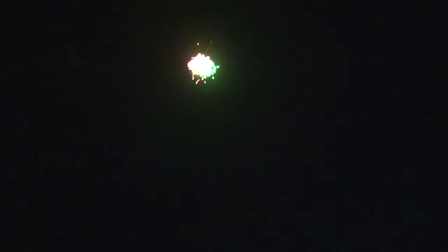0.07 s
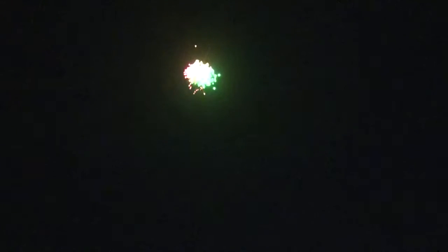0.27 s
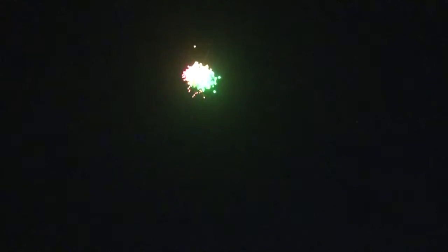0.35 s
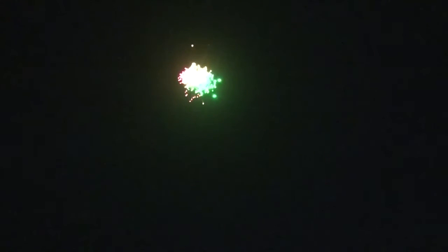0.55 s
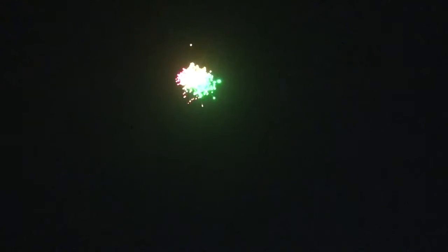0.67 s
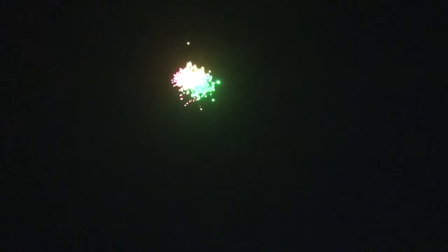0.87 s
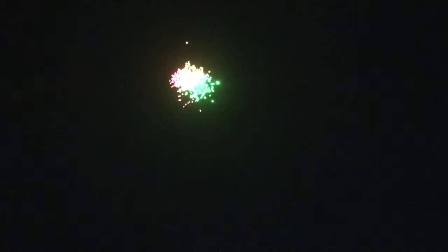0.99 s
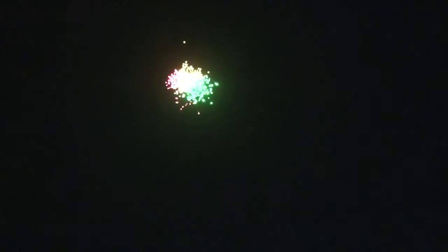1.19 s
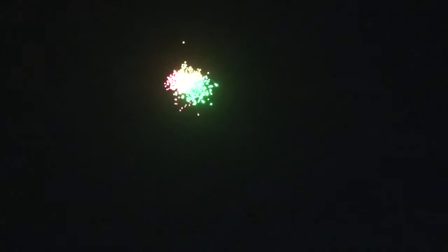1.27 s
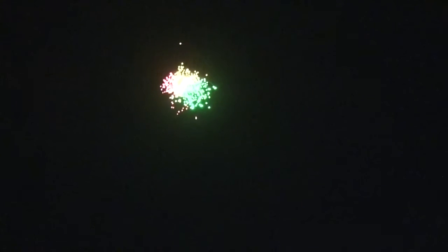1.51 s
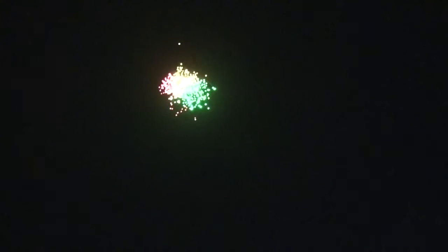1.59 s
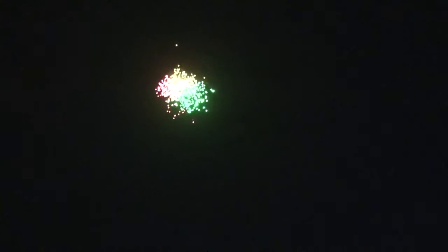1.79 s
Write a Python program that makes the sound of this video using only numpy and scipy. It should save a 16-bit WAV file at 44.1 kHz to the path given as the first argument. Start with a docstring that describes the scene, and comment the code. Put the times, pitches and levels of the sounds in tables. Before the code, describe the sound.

A firework shell bursts overhead at about 0.2 seconds with one sharp, loud bang, after barely audible insect chirps in the quiet night air. Duller thuds echo back right away, with more around 0.8 to 1 second. A low rumble and soft hiss roll on in waves, growing duller and fading by about 2 seconds. Near 1.5 seconds comes a faint, brief crackle close by.

```python
"""Outdoors at night, a firework shell bursts high overhead. Its N-shaped shock wave overloads the
microphone and bounces off the ground. Single walls return it as thuds; wide slopes of scatterers return
it as a rolling boom and rumble, with a hiss that the air dulls with distance. A faint insect chirps
before the burst, and something crackles briefly close by."""
import sys
import numpy as np
from scipy import signal
from scipy.fft import rfft, irfft
from scipy.io import wavfile

SR = 44100
rng = np.random.default_rng(int(sys.argv[2]) if len(sys.argv) > 2 else 0)


def generate_wav(sig):
    """Save sig (samples, or channels by samples) to the path in sys.argv[1] as 16-bit PCM at SR."""
    pcm = np.round(np.clip(np.atleast_2d(sig).T, -1, 1) * 32767).astype(np.int16)
    wavfile.write(sys.argv[1], SR, pcm)


N = 81585
TIME_S = np.arange(N) / SR
BURST_S = 0.20475
BOUNCE_S = BURST_S + 0.0059


def undb(db):
    """Decibels to gain."""
    return 10 ** (np.asarray(db) / 20)


def cut(x, hz, kind):
    """Second-order Butterworth low-pass or high-pass."""
    return signal.sosfilt(signal.butter(2, hz, kind, fs=SR, output="sos"), x)


def unit_rms(x):
    """Scale to rms 1."""
    return x / np.sqrt(np.mean(x ** 2))


def noise(spectrum):
    """Independent mid and side noise of one spectral shape, rms 1."""
    hz = np.arange(N // 2 + 1) * SR / N + 1
    knots_hz, knots_db = np.transpose(spectrum)
    gain = undb(np.interp(np.log(hz), np.log(knots_hz), knots_db))
    return unit_rms(irfft(rfft(rng.standard_normal((2, N))) * gain, N))


def fade(start_s, rise_s, decay_s):
    """Linear rise, exponential decay."""
    age = np.maximum(TIME_S - start_s, 0)
    return np.minimum(age / rise_s, 1) * np.exp(-age / decay_s)


def n_wave(start_s, length_s, lowpass_hz, tail_db=-7.5):
    """Jump, ramp through zero, weaker jump back; the path rounds it, the microphone thins its bass."""
    age = TIME_S - start_s
    gate = np.clip(age * SR, 0, 1) * np.clip((length_s - age) * SR, 0, 1)
    along = np.clip(age / length_s, 0, 1)
    shock = gate * (2 * along - 1) * undb(tail_db * along)
    rounded = cut(shock + 1e-18, lowpass_hz, "low")
    return cut(rounded, hz=125.3, kind="high")


def burst():
    """Direct shock, its sharp front and its duller ground bounce."""
    direct = undb(5.5) * n_wave(BURST_S, length_s=0.002566, lowpass_hz=720)
    front = undb(-6) * np.exp(-((TIME_S - BURST_S) / 22e-6) ** 2)
    bounce = undb(3) * n_wave(BOUNCE_S, length_s=0.003, lowpass_hz=430)
    return direct + front + bounce


# Ground scatter spectrum: f/Hz, level/dB
SCATTER_SPECTRUM = [(40, -9), (150, 6), (350, 10.5), (600, -7.5), (1400, -8.5), (3000, -17.5),
                    (6000, -29.5), (10000, -47.5), (16000, -60)]


def ground_scatter(t60_s=0.088):
    """Nearby ground scatters the shock."""
    envelope = fade(BOUNCE_S, rise_s=0.00094, decay_s=t60_s / np.log(1000))
    return undb(-17) * envelope * noise(SCATTER_SPECTRUM)


# Wake spectrum: f/Hz, level/dB
WAKE_SPECTRUM = [(300, -20.5), (1200, 5.5), (2000, -3), (4000, -13), (7000, -29.5), (16000, -42)]


def wakes(decay_s=0.0015):
    """Ragged wake behind each of the two shock fronts."""
    direct = undb(-6) * fade(BURST_S, 0.0006, decay_s)
    bounce = undb(-9) * fade(BOUNCE_S, 0.0001, decay_s)
    return (direct + bounce) * noise(WAKE_SPECTRUM)


# Wall echoes: t/s, level/dB, N-wave length/s, low-pass f/Hz
WALL_ECHOES = [(.2174, -35, 0.0038, 600), (0.2215, -16, .0024, 1210), (.2523, -7.5, 0.0022, 770),
               (0.2874, -12, 0.00263, 330), (0.3935, -20, 0.0046, 280), (0.4033, -18.5, 0.0057, 400),
               (0.4115, -22, 0.00385, 350), (.4360, -15, .0028, 430), (0.4441, -17, .0026, 584),
               (0.5366, -19.5, 0.00248, 507), (0.7508, -23, 0.00205, 694), (0.8261, -12.5, 0.0023, 540),
               (0.8458, -25, 0.0023, 800), (0.9321, -16, 0.0025, 415), (1.0053, -20, .0025, 480),
               (1.4178, -25.5, 0.0024, 450)]


def wall_echoes():
    """Single walls return rounded copies of the shock."""
    return sum(undb(db) * n_wave(start_s, length_s, hz) for start_s, db, length_s, hz in WALL_ECHOES)


# Waves of echo from the slopes: t/s, length/s, boom level/dB, rumble level/dB, hiss level/dB
SLOPE_ECHOES = [(0.237, 0.078, -39.5, -38, -47), (0.396, 0.061, -45.5, -41.5, -46.5),
                (.473, 0.08, -46.5, -40, -46), (0.559, 0.06, -45, -43.5, -55),
                (0.629, 0.089, -52, -46.5, -53.5), (0.671, 0.097, -54, -46.5, -46),
                (0.782, 0.087, -46, -43, -44), (0.893, .15, -51.5, -47, -50.5),
                (1.043, 0.13, -58.5, -54, -55), (1.206, 0.1, -51.5, -49.5, -51.5),
                (1.298, 0.14, -51.5, -47.5, -50.5), (1.452, 0.2, -55, -48.5, -51.5),
                (1.655, 0.097, -59.5, -54, -53.5), (1.772, 0.12, -64.5, -58.5, -57)]


def slope_envelope(layer, attack_s=0.011, fast_s=0.022, slow_s=0.26):
    """One layer's envelope: each wave of echo rises, holds and lingers; their powers add."""
    column = ("boom", "rumble", "hiss").index(layer)
    power = 0
    for start_s, length_s, *levels_db in SLOPE_ECHOES:
        age = TIME_S - start_s
        attack = np.clip(age / attack_s, 0, 1)
        after = np.maximum(age - length_s, 0)
        release = 0.77 * np.exp(-after / fast_s) + 0.23 * np.exp(-after / slow_s)
        power += (undb(levels_db[column]) * attack * release) ** 2
    return np.sqrt(power)


def rumble(rate_per_s=1500):
    """Many small scattered copies of the shock overlap."""
    arrivals = (rng.random((2, N)) < rate_per_s / SR) * rng.choice([-1, 1], (2, N))
    shock = n_wave(0, length_s=0.0032, lowpass_hz=473)
    copies = signal.fftconvolve(arrivals, shock[None])[:, :N]
    return unit_rms(copies) * slope_envelope("rumble")


# Boom spectrum: f/Hz, level/dB
BOOM_SPECTRUM = [(20, -32.5), (45, -9.5), (85, -1), (140, 0.5), (200, -4.5), (300, -23), (1000, -73)]


def boom():
    """Broad slopes return only the bass of the shock."""
    return noise(BOOM_SPECTRUM) * slope_envelope("boom")


# Hiss spectrum before air loss: f/Hz, level/dB
HISS_SPECTRUM = [(100, -18.5), (350, 3), (600, -1), (1300, -3), (2500, -8), (4500, -13.5), (7000, -23.5),
                 (12000, -37.5), (16000, -58)]


def hiss(air_db_per_s=7.5, ref_hz=3860):
    """Small scatterers return the treble; air absorbs more of it on longer paths."""
    hz, frame_s, bands = signal.stft(noise(HISS_SPECTRUM), SR, nperseg=512)
    extra_travel_s = np.maximum(frame_s - BURST_S, 0)
    loss_db = air_db_per_s * np.outer((hz / ref_hz) ** 2.32, extra_travel_s)
    _, dulled = signal.istft(bands * undb(-loss_db), SR)
    return dulled[:, :N] * slope_envelope("hiss")


# Close clicks: t/s, level/dB
CLICKS = [(1.519, -49), (1.5239, -43.5), (1.5352, -40), (1.5421, -50), (1.5583, -43), (1.5678, -45.5),
          (1.5776, -46), (1.581, -43)]
# Click spectrum: f/Hz, level/dB
CLICK_SPECTRUM = [(500, 4), (2000, 6.5), (5000, -4.5), (7500, -16.5), (12000, -21), (16000, -37)]


def crackle():
    """Dry clicks close by, each with a faint tail."""
    envelope = 0
    for start_s, db in CLICKS:
        click = fade(start_s, rise_s=0.00034, decay_s=0.0018)
        tail = undb(-14) * fade(start_s, rise_s=0.0011, decay_s=0.011)
        envelope += undb(db) * (click + tail)
    return envelope * noise(CLICK_SPECTRUM)


# Paired insect chirps: t/s, initial pitch excess/Hz
INSECT_CHIRPS = [(.026, 350), (0.061, 30), (.151, 350), (0.184, 30)]


def insect(pitch_hz=2265, sag_s=0.0049, length_s=0.031):
    """Short whistles that sag onto one pitch."""
    chirps = 0
    for start_s, excess_hz in INSECT_CHIRPS:
        age = np.clip(TIME_S - start_s, 0, length_s)
        hz = pitch_hz + excess_hz * np.exp(-age / sag_s)
        envelope = np.sin(np.pi * age / length_s)
        chirps += envelope * np.sin(2 * np.pi * np.cumsum(hz) / SR)
    return undb(-60) * chirps


# Night background spectrum: f/Hz, level/dB
NIGHT_SPECTRUM = [(25, -7.5), (70, 2.5), (320, -13.5), (1200, -22), (2000, -20.5), (2450, -15),
                  (2900, -27.5), (4200, -25.5), (4900, -21.5), (5600, -33), (16000, -52)]


def night():
    """Faint steady noise, mostly bass."""
    return undb(-64.5) * noise(NIGHT_SPECTRUM)


def scene():
    """Burst, wall echoes and insect centred; the rest spreads left and right in the treble."""
    mid, side = ground_scatter() + wakes() + boom() + rumble() + hiss() + crackle() + night()
    centre = burst() + wall_echoes() + insect() + mid
    width = undb(-11) * cut(side, hz=560, kind="high")
    return np.array([centre + width, centre - width])


def record(dry, ceiling=0.68, top_hz=15900):
    """Microphone overload flattens the peaks; a steep low-pass follows."""
    flattened = ceiling * np.tanh(dry / ceiling)
    lowpass = signal.ellip(8, 0.2, 70, top_hz, fs=SR, output="sos")
    return signal.sosfilt(lowpass, flattened)


dry = scene()
out = record(dry)
generate_wav(out)
```